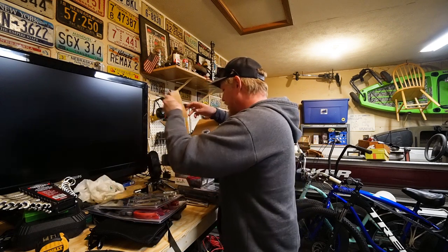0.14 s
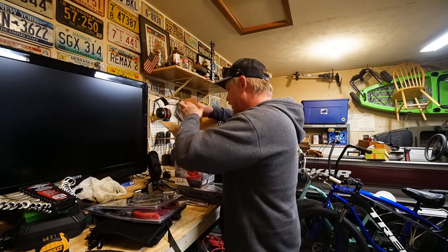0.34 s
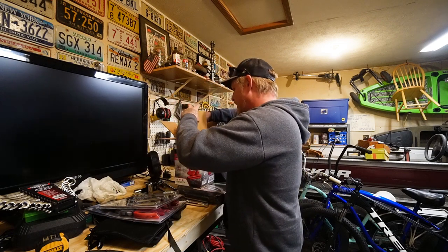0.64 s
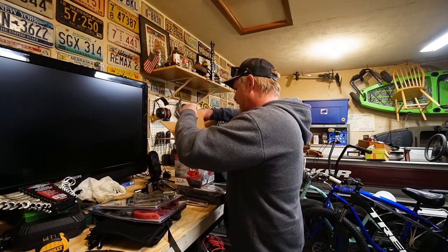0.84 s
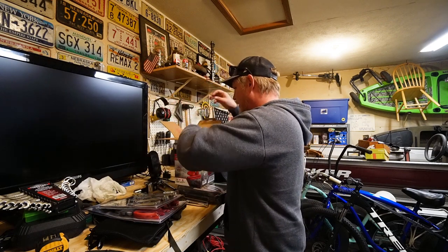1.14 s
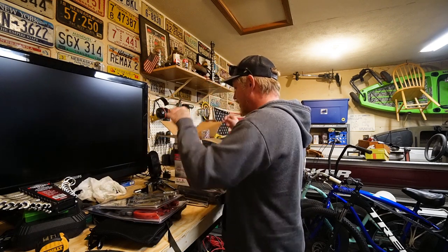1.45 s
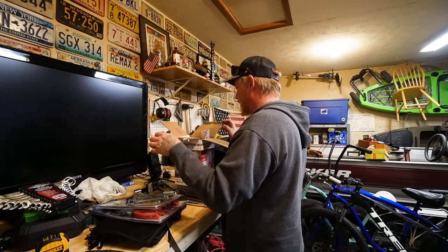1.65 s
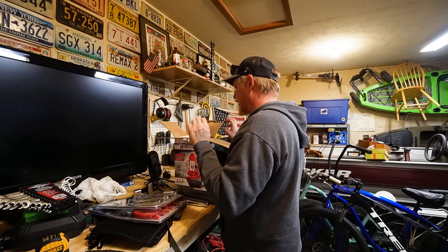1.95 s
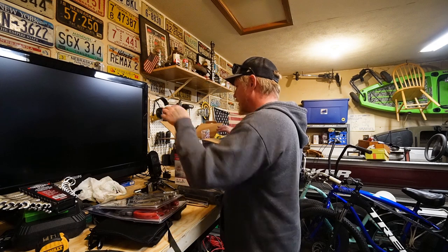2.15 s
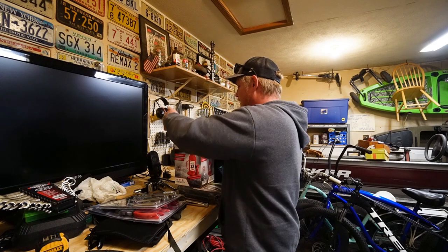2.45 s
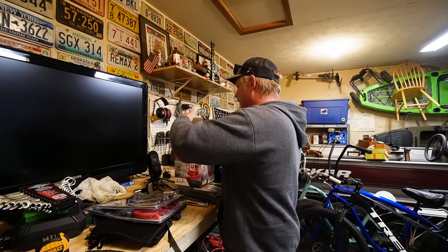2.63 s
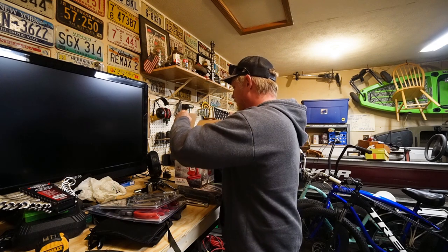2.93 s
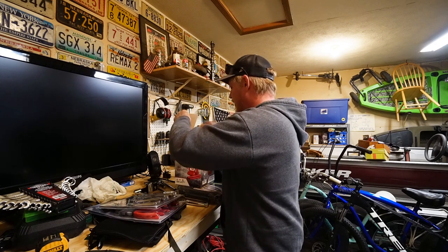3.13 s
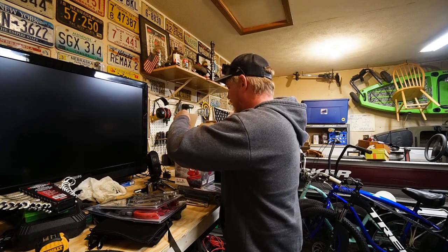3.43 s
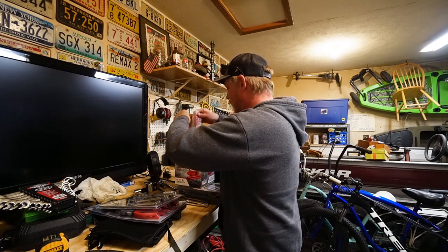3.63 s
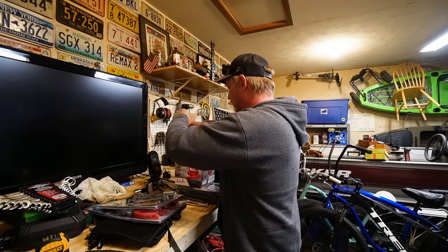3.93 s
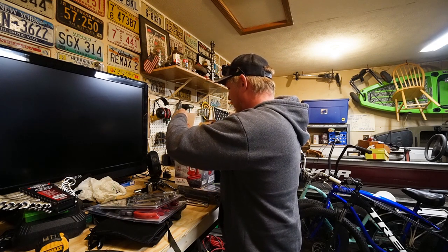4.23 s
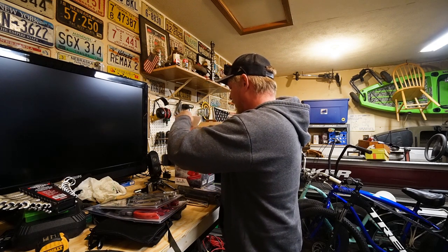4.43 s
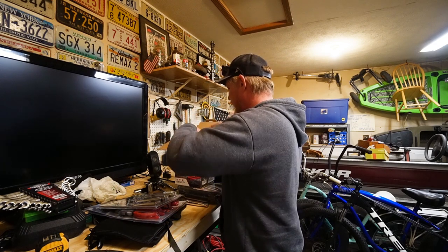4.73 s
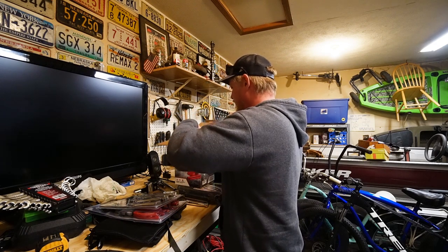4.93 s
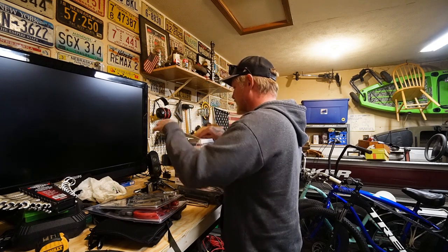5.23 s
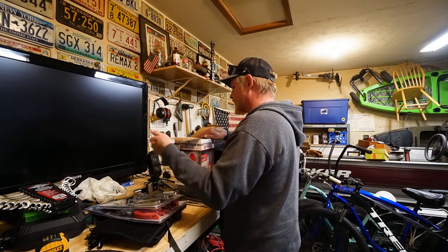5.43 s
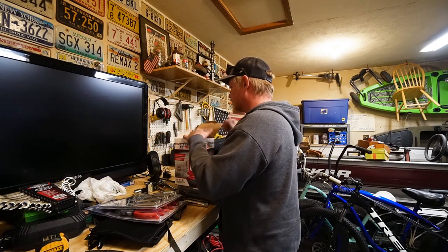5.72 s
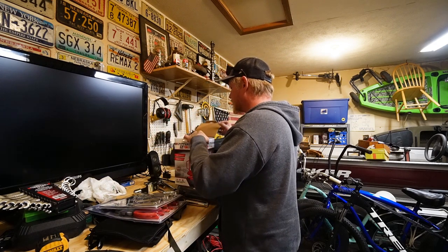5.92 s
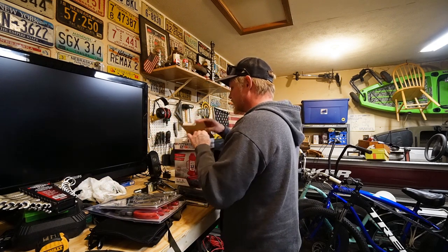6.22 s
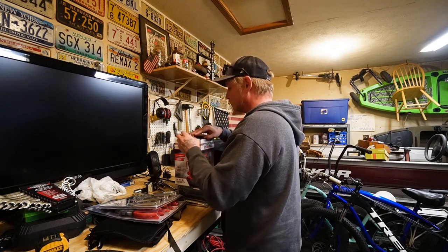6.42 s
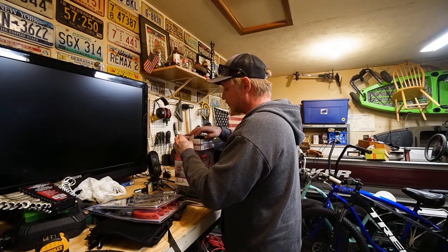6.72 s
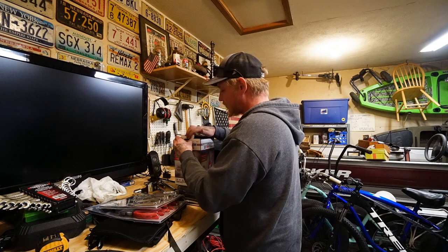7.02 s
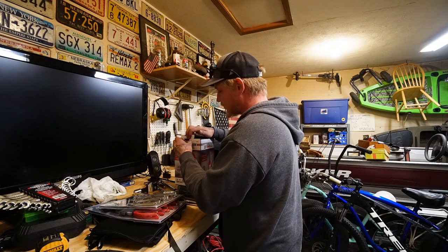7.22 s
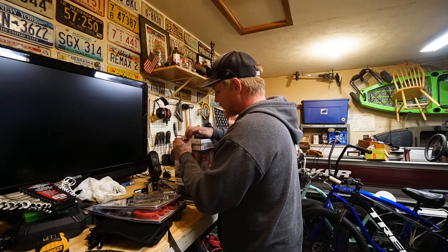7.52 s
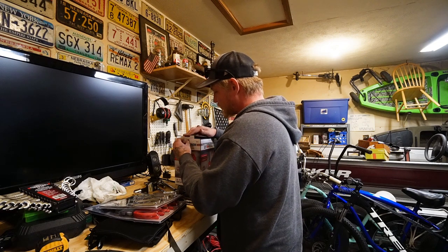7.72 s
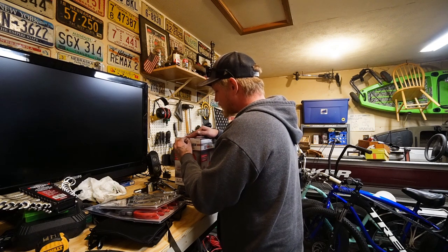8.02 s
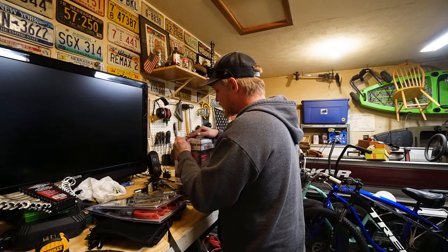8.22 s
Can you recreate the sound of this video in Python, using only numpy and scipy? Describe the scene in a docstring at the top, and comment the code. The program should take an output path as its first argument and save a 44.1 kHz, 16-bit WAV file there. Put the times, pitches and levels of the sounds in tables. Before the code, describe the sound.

Close, dry handling of a cardboard box in a cluttered garage: short hollow knocks, flap raps, edge flicks and sliding scrapes, with a quiet gap around two seconds. The busiest, loudest box knocks come from about three to six seconds. It then calms, a hand tool ticks and snaps sharply, and a hard clack follows near the end. Faint room hum and a slowing far engine sit behind.

```python
"""In a cluttered garage, a cardboard box is handled on a workbench, with a faint hum behind it.
Clusters of random slips excite the box: resonators give panels, flaps and bench, filters the cut edges.
Sliding card and cloth are filtered slip trains; squeaks and rubs are wavering sines.
A hand tool clicks, snaps and comes down hard: short contacts, filtered and set ringing.
Behind are filtered noise for room air, sines for an appliance hum, and a far engine that slows down."""
import sys
import numpy as np
from scipy import signal
from scipy.fft import rfft, irfft
from scipy.io import wavfile
from scipy.ndimage import uniform_filter1d

SR = 44100
rng = np.random.default_rng(int(sys.argv[2]) if len(sys.argv) > 2 else 0)


def master(y):
    """Save y as 16-bit WAV."""
    cut = np.clip(np.atleast_2d(y).T, -1, 1)
    pcm = np.round(cut * 32767)  # scale
    wavfile.write(sys.argv[1], SR, pcm.astype(np.int16))


N = 368676
TIME = np.arange(N) / SR
BLOW = np.arange(20480) / SR   # time axis of one short event [s]

# blows on the box; panel level is before its trim: (time [s], rise time [s], panel pitch [Hz],
# panel level [dB], flap struck [name], flap level [dB], edge crackle level [dB])
BLOWS = [(.614, 0.0043, 185, -42, "short", -47, -56), (0.64, 0.0027, 185, -41, "long", -56, -68),
         (.743, 0.0028, 240, -46.5, "short", -50, -46.5), (.956, 0.0029, 295, -36.5, "long", -35.5, -50),
         (1.062, 0.0089, 264, -41.5, "short", -47.5, -52), (1.224, 0.0036, 240, -41, "long", -59, -45),
         (1.417, 0.0028, 522, -37, "inner", -42.5, -43), (1.442, 0.0063, 261, -70, "long", -53, -52),
         (1.475, 0.0084, 380, -47, "short", -54, -54.5), (1.522, .005, 190, -49.5, "long", -57, -62),
         (2.487, 0.013, 328, -44, "long", -54, -58.5), (3.052, 0.011, 176, -40.5, "short", -56, -44.5),
         (3.077, 0.0047, 402, -40, "long", -47, -47.5), (3.096, 0.0037, 185, -38.5, "long", -58, -56),
         (3.123, 0.0074, 176, -54.5, "long", -62, -61), (3.574, 0.0057, 490, -43, "long", -44.5, -45),
         (3.634, 0.0049, 237, -42.5, "long", -48, -50), (3.74, 0.0018, 352, -31, "inner", -48, -41.5),
         (3.748, 0.0035, 359, -30, "long", -33.5, -42), (3.905, 0.007, 382, -43.5, "short", -48, -43.5),
         (4.038, 0.012, 415, -35.5, "long", -40, -42), (4.075, 0.0056, 477, -37.5, "long", -43.5, -42),
         (4.106, 0.0034, 327, -30, "short", -36.5, -33.5), (4.307, 0.013, 510, -43, "short", -49, -41),
         (4.733, 0.0011, 457, -39, "long", -43.5, -51), (4.931, 0.0022, 214, -46.5, "long", -53, -52),
         (5.1471, 0.0012, 402, -43, "inner", -30, -60), (5.152, 0.0017, 385, -30, "short", -30.5, -41.5),
         (5.177, 0.005, 330, -60, "short", -43.5, -57), (5.186, 0.0028, 383, -37, "inner", -41.5, -52),
         (5.205, 0.0018, 327, -49.5, "short", -48, -52), (5.305, 0.0025, 408, -32, "long", -40.5, -45.5),
         (5.511, 0.0071, 290, -44.5, "short", -60, -50.5), (5.733, 0.0024, 278, -41, "long", -46.5, -47),
         (5.748, 0.0026, 284, -38.5, "long", -47, -40), (5.773, 0.0035, 222, -49.5, "short", -61, -37.5),
         (5.827, 0.0021, 337, -33, "long", -48.5, -44), (5.967, 0.0046, 541, -45, "long", -48, -42),
         (5.988, 0.0021, 565, -48, "short", -50, -44.5), (6.026, 0.0033, 270, -51, "long", -64, -60),
         (6.292, 0.0033, 230, -51.5, "long", -63, -61), (6.59, 0.0027, 240, -56.5, "long", -70, -74),
         (6.607, 0.0097, 246, -58.5, "long", -55, -62.5), (7.517, 0.0011, 416, -38.5, "long", -55, -31),
         (7.609, 0.0025, 378, -46.5, "long", -52, -45)]
# resonances of the bench top: (frequency [Hz], bandwidth [Hz], gain [dB])
BENCH_MODES = [(50, 41, -23), (137.8, 16, 25)]
# resonances of the box panels: (frequency [Hz], bandwidth [Hz], gain [dB])
PANEL_MODES = [(185, 77, -3), (240, 99, 0.5), (327, 54, -1.5), (455, 209, -5.5), (521, 106, -4)]
# resonances shared by all flaps: (frequency [Hz], bandwidth [Hz], gain [dB])
FLAP_MODES = [(820, 160, 13), (946, 69, 19.5), (1270, 390, -8), (1360, 1400, 0.5), (1760, 1100, 5.5)]
# each flap's own note: flap name to frequency [Hz]
FLAP_NOTE_HZ = {"long": 822, "inner": 1057, "short": 1245}
# colour of crackling cut edges, in the blows and in the flicks: (frequency [Hz], gain [dB])
EDGE_COLOUR = [(300, -30), (700, -4.5), (1200, -1.5), (2200, -1), (4200, 0.5), (6000, -3), (8000, -9.5),
               (11000, -20.5), (16000, -32.5)]
# bench thud at a blow of mean level [dB], and the share of the blow's level swing that it follows
THUD_DB, THUD_FOLLOWS = -66, 0.29
# while the box stands firmly on the bench [s], the thud is raised [dB]
STANDING_S, STANDING_DB = (4.8, 6.1), 13.5


def box(spots, panel_trim_db=2.0, note_db=2.5, note_ring_s=0.0043, flap_own_db=19.0,
        flap_width_hz=200, push_share=0.76):
    """Modal excitation: each blow thuds in the bench, booms in panels, raps in flaps, crackles at edges."""
    out = np.zeros((2, N))
    panel_band = signal.butter(2, [140, 700], "band", fs=SR, output="sos")
    bench_band = signal.butter(2, 240, fs=SR, output="sos")
    mean_panel_db = np.mean([row[3] for row in BLOWS])
    for k, (s, rise_s, panel_hz, panel_db, flap, flap_db, edge_db) in enumerate(BLOWS):
        thud_db = THUD_DB + THUD_FOLLOWS * (panel_db - mean_panel_db)
        if STANDING_S[0] < s < STANDING_S[1]:
            thud_db += STANDING_DB
        push = even(crumple(rise_s * push_share))   # the heavy parts answer a shorter cluster
        force = even(crumple(rise_s))

        thud = signal.sosfilt(bench_band, resonate(push, BENCH_MODES))
        panel_note = from_db(note_db) * note(panel_hz, rise_s, note_ring_s, rough=0.42)
        boom = signal.sosfilt(panel_band, rms_one(resonate(push, PANEL_MODES)) + panel_note)
        own_mode = (FLAP_NOTE_HZ[flap], flap_width_hz, flap_own_db)
        rap = resonate(force, FLAP_MODES + [own_mode])
        crackle = colour(crumple(rise_s), EDGE_COLOUR)

        parts = [(thud, thud_db), (boom, panel_db + panel_trim_db), (rap, flap_db), (crackle, edge_db)]
        place(out, s, parts, spots[k % len(spots)])
    return out


# card edges catching and flicking free:
# (time [s], rise time [s], level [dB], brightness [dB per octave])
EDGE_FLICKS = [(.320, .0022, -56.5, 3.5), (.346, 0.0052, -55.5, 1), (.775, 0.0036, -38.5, 4),
               (.816, 0.0038, -45, 0.5), (1.571, 0.015, -54, 5), (2.645, 0.0037, -53, -1),
               (2.805, 0.016, -53.5, 3), (2.924, 0.0047, -53.5, 4.5), (3.002, 0.004, -42, 3),
               (3.053, 0.0022, -40, 3), (3.179, 0.011, -46.5, 3.5), (3.267, 0.0054, -53, -2),
               (3.345, 0.037, -46.5, 2.5), (3.5845, 0.0014, -32.5, 2.5), (3.705, 0.0023, -51, 4),
               (4.3265, 0.0033, -35, -0.5), (4.62, 0.019, -46.5, 1.5), (4.828, 0.0032, -52.5, 0.5),
               (5.033, 0.0053, -60, 2), (5.157, 0.00096, -43.5, 13.5), (5.206, 0.0028, -47.5, 7),
               (5.340, 0.0039, -51, 6), (5.769, 0.0068, -33.5, -0.5), (6.044, 0.0073, -49.5, -4)]
# brief squeaks and groans of sliding card: (time [s], rise time [s], pitch [Hz], level [dB])
CARD_SQUEAKS = [(0.392, 0.0035, 1376, -52.5), (0.42, 0.0026, 1364, -48), (0.776, 0.0027, 1593, -43),
                (.822, 0.0026, 2000, -45), (1.42, 0.0045, 1250, -42), (1.445, 0.01, 523, -46.5),
                (1.478, 0.0037, 524, -43.5), (1.51, 0.0091, 534, -48), (2.735, 0.0026, 1940, -56.5),
                (2.872, .003, 1290, -58), (2.93, 0.0041, 1370, -57.5), (7.459, .003, 1690, -48),
                (7.791, .013, 1630, -59), (7.836, 0.014, 1670, -55)]
TILT_PIVOT_HZ = 3000   # brightness leaves the gain here unchanged
CONTACT_ROUGH = .8   # relative amplitude roughness of squeaks and tool notes


def edges(spots, squeak_hold=1.44, wander_hz=50):
    """Stick-slip friction: cut edges flick past each other in bursts, or squeak on one pitch."""
    out = np.zeros((2, N))
    for k, (s, rise_s, db, brightness) in enumerate(EDGE_FLICKS):
        tilted = [(hz, gain + brightness * np.log2(hz / TILT_PIVOT_HZ)) for hz, gain in EDGE_COLOUR]
        flick = colour(crumple(rise_s), tilted)
        place(out, s, [(flick, db)], spots[k % len(spots)])
    for s, rise_s, hz, db in CARD_SQUEAKS:
        squeak = note(hz, rise_s, rise_s * squeak_hold, wander_hz, rough=CONTACT_ROUGH)
        place(out, s, [(squeak, db)], spots[0])
    return out


# hands and flaps slide over the box; scrape and drag levels are before their trims:
# (start [s], length [s], fibre hiss level [dB], swell [dB], flap scrape level [dB], panel drag level [dB])
SLIDE_STROKES = [(-.03, 0.12, -58, -5, -55.5, -62), (0.087, 0.2, -62.5, -1, -70, -69),
                 (0.348, 0.091, -56, 9, -61, -68), (0.625, 0.31, -55.5, -4, -51, -59.5),
                 (0.996, 0.27, -52.5, 2, -44.5, -54.5), (1.536, 0.053, -63.5, 2, -49.5, -47),
                 (1.63, 0.3, -70, -16, -65.5, -66), (2.531, 0.12, -62, 21.5, -58, -59),
                 (2.717, 0.26, -62, 6, -59.5, -56.5), (2.986, 0.32, -51, 1, -53.5, -55.5),
                 (3.31, 0.18, -49, -4.5, -52, -51.5), (3.484, 0.13, -48, 13, -50, -48),
                 (3.663, 0.51, -53, 12, -49, -49.5), (4.333, 0.26, -56.5, 7, -57.5, -61),
                 (4.491, 0.19, -59, 31, -54.5, -65.5), (4.767, 0.4, -66, -9, -55, -53.5),
                 (5.143, 0.25, -57.5, -5, -46.5, -58), (5.546, 0.21, -73, 11, -63, -64),
                 (6.008, 0.43, -64.5, -22, -59.5, -59.5), (6.643, 0.26, -72, 5.5, -68.5, -61),
                 (6.934, 1, -70.5, 8, -68, -66), (7.524, 0.5, -55, 2, -65, -74)]
# colour of the fibre hiss: (frequency [Hz], gain [dB])
HISS_COLOUR = [(500, -33), (1500, -11.5), (2500, -0.5), (4500, 3.5), (6500, -1.5), (9800, -8),
               (14000, -22.5), (16000, -25)]
# colour of a scraped flap: (frequency [Hz], gain [dB])
SCRAPE_COLOUR = [(400, -12.5), (650, -14.5), (930, 6.5), (1110, -4), (1400, 2.5), (2100, -1.5), (3200, -8),
                 (8000, -30)]
# colour of panels shaken by the drag: (frequency [Hz], gain [dB])
DRAG_COLOUR = [(30, -39), (70, -19), (100, -37.5), (173, -2.5), (248, -3.5), (350, -6.5), (470, -5),
               (620, -15), (1500, -35), (4000, -63)]


def sliding(room, scrape_trim_db=-5.5, drag_trim_db=-3.5, snag_db=-10.0):
    """Sliding friction: fibres slip in clumps and some snag harder; the drag also shakes flaps and panels."""
    start, length, hiss_db, swell_db, scrape_db, drag_db = np.transpose(SLIDE_STROKES)
    pressure_db = 1.4 * drift(30)
    clumps = from_db(2.1 * drift(110))
    fibres = rms_one(slips(2800, 3.7, N) * clumps) + from_db(snag_db) * snags()
    layers = [(fibres, HISS_COLOUR, hiss_db),
              (slips(500, 3.9, N), SCRAPE_COLOUR, scrape_db + scrape_trim_db),
              (slips(900, 2.9, N), DRAG_COLOUR, drag_db + drag_trim_db)]
    sound = np.zeros((2, N))
    for grain, spectrum, db in layers:
        rubbed = rms_one(heard(colour(grain, spectrum), room))
        sound += rubbed * strokes(start, length, db, swell_db)
    return sound * from_db(pressure_db)


def snags(count=7):
    """Impulse response of resonators: fibres that snag harder let go in ticks, each on its own pitch."""
    pitches = np.geomspace(1300, 7000, count)
    return rms_one(sum(resonate(slips(9, 2.2, N), [(hz, hz / 7, 0)]) for hz in pitches))


# a flap rubs along its neighbour with a hoarse, gliding note:
# (start [s], length [s], first frequency [Hz], last frequency [Hz], level [dB])
FLAP_RUBS = [(0.666, .1, 1350, 1410, -53), (1.053, 0.26, 1413, 1774, -55)]


def rubbing(room, hoarse_hz=230):
    """Frequency modulation: a rubbed flap's note glides as its free length changes; jitter makes it hoarse."""
    out = np.zeros((2, N))
    for start, length, first_hz, last_hz, db in FLAP_RUBS:
        done = np.clip(BLOW / length, 0, 1)
        jitter = rms_one(uniform_filter1d(rng.standard_normal(len(BLOW)), size=44))
        hz = first_hz + (last_hz - first_hz) * done + hoarse_hz * jitter
        rub = np.sqrt(done * (1 - done)) * np.sin(2 * np.pi * np.cumsum(hz) / SR)
        place(out, start, [(rub, db)], room)
    return out


# a sleeve brushes over the box: (start [s], length [s], level [dB], swell [dB])
SLEEVE_BRUSHES = [(1.033, 0.16, -51.5, 9.5), (1.92, 0.035, -70, -5), (2.5, 0.45, -69, 23),
                  (5.007, 0.13, -67, 8), (5.11, 0.26, -56, -7), (5.515, 0.27, -58.5, 10),
                  (6.014, 0.28, -58.5, 3)]
# colour of brushing cloth: (frequency [Hz], gain [dB])
CLOTH_COLOUR = [(2000, -8), (5000, 5.5), (8000, 2), (12000, -5), (16000, -13)]


def sleeve(room):
    """Broadband friction: dense slips of cloth make a thin, bright swish."""
    swish = rms_one(heard(colour(slips(8000, 3.0, N), CLOTH_COLOUR), room))
    return swish * strokes(*np.transpose(SLEEVE_BRUSHES))


# clicks of the hand tool; click level is before its trim: (time [s], click level [dB],
# steel ring level [dB], chatter time [s], ringing notes as (frequency [Hz], level [dB]))
TOOL_CLICKS = [(.5395, -48.5, -65, .0052, [(935, -52), (1300, -50)]),
               (3.001, -39, -61, .0032, [(1280, -41.5), (2620, -55)]),
               (3.0035, -75, -73, .0027, [(3850, -47.5), (4360, -42)]),
               (3.8668, -62, -56, .003, [(1803, -40.5), (2200, -39.5)]),
               (3.873, -40, -48, .004, [(1330, -43)]), (7.2288, -54, -57, .0085, [(2230, -51)]),
               (7.24, -72, -59, .0084, [(2290, -54.5)]), (7.274, -52, -65, .0043, [(2280, -56)]),
               (7.372, -62, -75, .008, [(1750, -62)]), (7.421, -58, -67, .008, [(1300, -62)]),
               (7.4295, -40, -62, .005, [(1350, -51), (2280, -53)]),
               (7.4945, -21, -41, .00065, [(1230, -35.5), (3650, -34)]),
               (7.5005, -31, -48, .00084, [(1350, -46)]), (7.5149, -24.5, -48, .002, [(965, -35.5),
               (1631, -31)]), (7.5185, -25.5, -28, .00091, [(1450, -46)]),
               (7.548, -40.5, -52, .0054, [(1480, -51)]), (7.582, -48, -53.5, .006, [(1450, -58)]),
               (7.612, -50, -60, .004, [(1650, -47)])]
# colour of the contact of the tool parts: (frequency [Hz], gain [dB])
TOOL_COLOUR = [(150, -23), (400, 1), (720, -22), (950, 1.5), (1500, 9.5), (2050, -3), (2900, 6.5),
               (4200, 8), (5800, 5), (8000, -3.5), (11000, -16.5), (16000, -57)]
# resonances of the tool's steel: (frequency [Hz], bandwidth [Hz], gain [dB])
STEEL_MODES = [(990, 18, 4.5), (1640, 32, 12.5), (2370, 24, -1), (3500, 26, -2), (3800, 26, -9),
               (4200, 29, -2), (5100, 26, -8)]


def tool(click_trim_db=-2.0, ring_s=0.0057, rise_share=.5, count=4):
    """Impact and free vibration: parts of a tool turning in the hand tick on a pitch; the steel rings longer."""
    out = np.zeros((2, N))
    spots = [garage(early_db=6.5, early_s=0.0034, tail_db=2.5, lean=0.093) for _ in range(count)]
    steel_ring = resonate(1.0 * (BLOW == 0), STEEL_MODES)
    for k, (s, click_db, steel_db, chatter_s, notes) in enumerate(TOOL_CLICKS):
        force = even(contact(chatter_s, chatter_db=-3.5))
        parts = [(colour(force, TOOL_COLOUR), click_db + click_trim_db), (steel_ring, steel_db)]
        for hz, db in notes:
            ring = note(hz, chatter_s * rise_share, ring_s, wander_hz=55, rough=CONTACT_ROUGH)
            parts.append((ring, db))
        place(out, s, parts, spots[k % count])
    return out


# the tool comes down hard, a single row: (time [s], level [dB], chatter time [s])
HARD_LANDING = (7.8702, -16.5, 0.0029)
# colour of the landing: (frequency [Hz], gain [dB])
LANDING_COLOUR = [(40, -25), (110, -18.5), (180, -5.5), (330, -0.5), (520, -3.5), (660, -8), (900, -0.5),
                  (1800, -2), (3000, -2.5), (4100, -8), (5400, -5), (7500, -17.5), (11000, -29.5),
                  (16000, -44)]
# ring of the landing: (frequency [Hz], bandwidth [Hz], boost [dB])
LANDING_RING = [(407, 52, 11.5), (970, 50, 5), (1294, 40, 2), (1740, 92, 7.5), (2420, 67, 7),
                (3012, 35, 3.5), (4990, 98, 4.5)]


def clack():
    """Impact and resonance: the tool lands, chatters for a few milliseconds and sets the room ringing."""
    out, room = np.zeros((2, N)), garage(early_db=6.5, early_s=0.0091, tail_db=6.5, lean=0.08)
    s, db, chatter_s = HARD_LANDING
    blow = colour(even(contact(chatter_s, chatter_db=6.0)), LANDING_COLOUR)
    for hz, width, boost_db in LANDING_RING:
        blow = blow + (from_db(boost_db) - 1) * resonate(blow, [(hz, width, 0)])
    place(out, s, [(blow, db)], room)
    return out


# colour of still room air: (frequency [Hz], gain [dB])
AIR_COLOUR = [(25, -26), (70, -23.5), (150, -10.5), (195, -16.5), (242, -1), (295, -9), (390, -14),
              (475, -9.5), (600, -21.5), (1230, -18), (2840, -26.5), (4600, -25.5), (7500, -33),
              (16000, -52.5)]
# appliance hum, before its trim: (frequency [Hz], mean rms level [dB])
HUM_TONES = [(120, -90.5), (158, -79), (241.5, -65.5), (332, -76.5), (475, -88)]
# far engine: (time [s], frequency of the second order [Hz], second-order level before trim [dB])
ENGINE_TRACK = [(4.2, 83.5, -85), (4.6, 78.2, -66.5), (5.0, 74.5, -59), (5.401, 66.7, -58), (5.8, 60, -60),
                (6.4, 58.6, -66.5), (6.9, 55, -72), (7.3, 54.2, -94)]


def background(air_db=-65.0, hum_trim_db=1.5, engine_trim_db=-7.5, third_order_db=2.0):
    """Noise and harmonic series: room air, a wavering hum, the second and third orders of a far engine."""
    air = rms_one(stereo(*[colour(white, AIR_COLOUR) for white in rng.standard_normal((2, N))]))

    hum = np.zeros(N)
    for hz, db in HUM_TONES:
        phase = 2 * np.pi * hz * TIME + .6 * drift(8)
        hum += from_db(db + hum_trim_db + 2.2 * drift(11)) * np.sin(phase)

    s, second_hz, db = np.transpose(ENGINE_TRACK)
    turn = np.pi * np.cumsum(np.interp(TIME, s, second_hz)) / SR   # phase of the first order
    orders = np.sin(2 * turn) + from_db(third_order_db) * np.sin(3 * turn)
    engine = from_db(np.interp(TIME, s, db) + engine_trim_db + 2.2 * drift(3.3)) * orders
    return from_db(air_db) * air + np.sqrt(2) * (hum + engine)   # sine rms to peak


# reverberation of the garage: (frequency [Hz], time to fall 60 dB [s])
ROOM_DECAY = [(100, 1), (300, 0.4239), (1000, 0.41), (4000, 0.49), (8000, 0.4), (16000, 0.3)]


def garage(early_db, early_s, tail_db, lean, gap_s=0.0014, count=9):
    """Room impulse response of one spot: direct sound, scatter off bench and wall, a diffuse tail."""
    hz, centres = np.fft.rfftfreq(len(BLOW), 1 / SR), np.geomspace(80, 16000, count)
    white = rfft(rng.standard_normal((2, len(BLOW))))
    tail = 0
    for centre, share in zip(centres, np.eye(count)):
        band = irfft(white * at_hz(np.c_[centres, share], hz), len(BLOW))
        tail = tail + band * np.exp(-np.log(1000) * BLOW / at_hz(ROOM_DECAY, centre))
    early = rng.standard_normal(tail.shape) ** 3 * np.exp(-BLOW / early_s)   # cubed: sparse echoes
    late = BLOW > gap_s
    mid, side = from_db(early_db) * rms_one(early * late) / np.sqrt(len(BLOW))
    mid = mid + (BLOW == 0)   # direct sound
    tail = from_db(tail_db) * rms_one(tail * late) / np.sqrt(len(BLOW))
    mid, side = [even(np.linalg.norm(near) * even(near) + far) for near, far in zip((mid, side), tail)]
    return stereo(mid, side, lean)


# stereo width: (frequency [Hz], gain of the side signal [dB])
STEREO_WIDTH = [(40, -13), (70, -21), (130, -34), (500, -19.5), (1000, -16), (2000, -14), (4000, -9),
                (8000, -6), (13000, -2.5)]


def stereo(mid, side, lean=0.0, shadow_hz=350):
    """Interchannel coherence: two channels alike in the bass differ higher up; treble can lean left."""
    shadow = signal.lfilter(*signal.butter(1, shadow_hz, "high", fs=SR), mid)
    return mid + (colour(side, STEREO_WIDTH) + lean * shadow) * np.array([[1], [-1]])


def heard(x, room):
    """Convolution: carry a sound through a room response."""
    return signal.oaconvolve(x[None], room, axes=1)[:, :len(x)]


def place(out, s, parts, room):
    """Superposition: set each (sound, level [dB]) part by its loudest 20 ms and add it at a time."""
    sound = sum(from_db(db) * loudest_one(heard(part, room)) for part, db in parts)
    i = max(round(s * SR), 0)
    out[:, i:i + sound.shape[1]] += sound[:, :N - i]


def slips(per_s, spread_db, size):
    """Stick-slip as a random impulse train of uneven strength and sign."""
    strength = from_db(spread_db * np.minimum(rng.exponential(1, size), 4)) * rng.choice([-1, 1], size)
    return strength * (rng.random(size) < per_s / SR)


def crumple(rise_s):
    """Buckling: soft card gives way in a cluster of slips that swells and fades."""
    age = BLOW / max(rise_s, 1e-3)
    return slips(7000, 2.1, len(BLOW)) * age * np.exp(-age)


def contact(length_s, chatter_db):
    """Impulsive contact: one hard touch, followed by small slips that die away."""
    chatter = slips(3000, 6.5, len(BLOW)) * np.exp(-BLOW / length_s)
    return (BLOW == 0) + from_db(chatter_db) * rms_one(chatter) / np.sqrt(len(BLOW))   # energy re touch


def note(hz, rise_s, ring_s, wander_hz=0.0, rough=0.0):
    """Damped oscillation: one pitch builds up and dies away, roughened by the rubbing contact; rms 1."""
    wander, grain = [rms_one(uniform_filter1d(rng.standard_normal(len(BLOW)), size=size))
                     for size in (90, 40)]
    envelope = (1 - np.exp(-BLOW / rise_s)) * np.exp(-BLOW / ring_s)
    phase = 2 * np.pi * np.cumsum(hz + wander_hz * wander) / SR
    return rms_one(envelope * (1 + rough * grain) * np.sin(phase))


STROKE_ATTACK_S, STROKE_RELEASE_DB_PER_S = 0.033, 126


def strokes(start, length, db, swell_db):
    """Amplitude envelope: each stroke attacks, swells or eases about its level, and dies away."""
    t = TIME[::40]
    age = t[:, None] - start
    held_db = db + swell_db * (np.clip(age / length, 0, 1) - .5)
    released_db = STROKE_RELEASE_DB_PER_S * np.maximum(age - length, 0)
    each = np.clip(age / STROKE_ATTACK_S, 0, 1) * from_db(held_db - released_db)
    return np.interp(TIME, t, np.linalg.norm(each, axis=1))   # overlaps add in power


def drift(rate):
    """Random modulation: straight lines between normal values of spread 1, rate of them a second."""
    knots = rng.standard_normal(int(N / SR * rate) + 2)
    return np.interp(TIME * rate, np.arange(len(knots)), knots)


def resonate(x, modes):
    """Modal superposition: parallel resonances of alternating sign."""
    out = 0
    for k, (hz, width, db) in enumerate(modes):
        r = np.exp(-np.pi * width / SR)
        poles = [1, -2 * r * np.cos(2 * np.pi * hz / SR), r * r]
        mode = (1 - r * r) / 2 * signal.lfilter([1, 0, -1], poles, x + 1e-18)
        out = out + (-1) ** k * from_db(db) * mode
    return out


def colour(x, spectrum, size=4096):
    """Linear filtering: a causal filter with the given spectrum."""
    kernel = irfft(causal(from_db(at_hz(spectrum, np.fft.rfftfreq(size, 1 / SR)))))
    return signal.oaconvolve(x, kernel)[:len(x)]


def causal(gain):
    """Minimum phase: the frequency response with the given magnitude, by folding the cepstrum."""
    cepstrum = irfft(np.log(gain + 1e-12))
    half = len(cepstrum) // 2
    cepstrum[1:half] *= 2
    cepstrum[half + 1:] = 0
    return np.exp(rfft(cepstrum))


def even(x, size=61):
    """Spectral whitening: level out the broad humps in the spectrum of a random burst."""
    spectrum = rfft(x)
    power = uniform_filter1d(np.abs(spectrum) ** 2 + 1e-9, size)
    return irfft(spectrum * causal(power ** -.5), len(x))


def at_hz(points, hz):
    """Logarithmic frequency scale: interpolate a table on it."""
    f, value = np.transpose(points)
    return np.interp(np.log(np.maximum(hz, 1)), np.log(f), value)


def from_db(db):
    """Level to amplitude: decibels to gain."""
    return 10 ** (np.asarray(db) / 20)


def rms_one(x):
    """Effective value: scale to rms 1."""
    return x / np.sqrt(np.mean(x ** 2) + 1e-20)


def loudest_one(x, size=880):
    """Short-time level: scale so that the loudest 20 ms have rms 1."""
    return x / np.sqrt(uniform_filter1d(np.mean(x ** 2, axis=0), size).max() + 1e-20)


def scene(count=5):
    """Superposition of sources: the box is worked at several spots on the bench."""
    spots = [garage(early_db=1.5, early_s=0.0095, tail_db=-2.0, lean=0.078) for _ in range(count)]
    cardboard = box(spots) + edges(spots) + sliding(spots[0]) + rubbing(spots[2])
    return cardboard + sleeve(spots[1]) + tool() + clack() + background()


def record(dry, cutoff_hz=15900):
    """Band limiting: a steep elliptic low-pass cuts the top."""
    return signal.sosfilt(signal.ellip(10, .1, 70, cutoff_hz, fs=SR, output="sos"), dry)


dry = scene()
out = record(dry)
master(out)
```